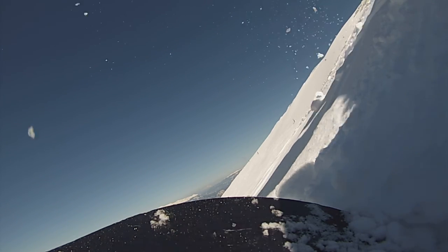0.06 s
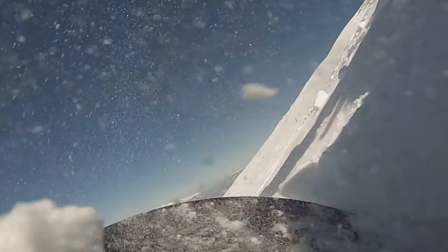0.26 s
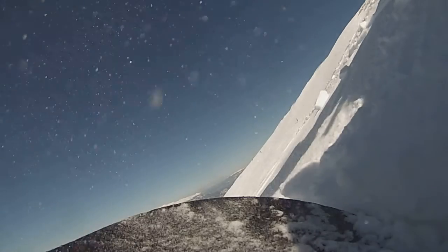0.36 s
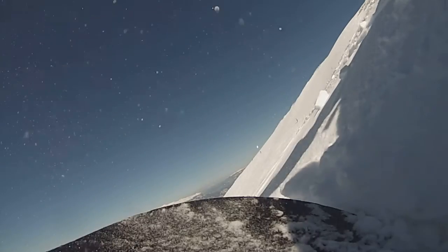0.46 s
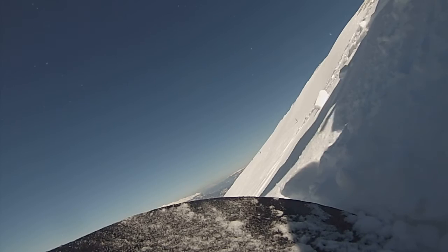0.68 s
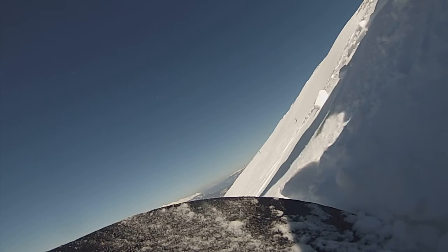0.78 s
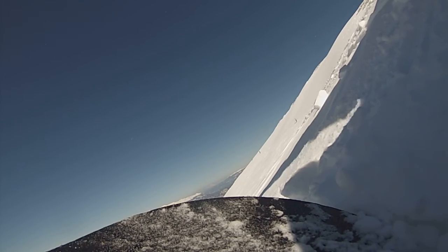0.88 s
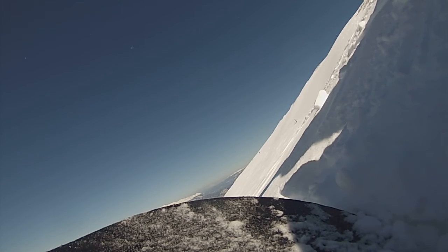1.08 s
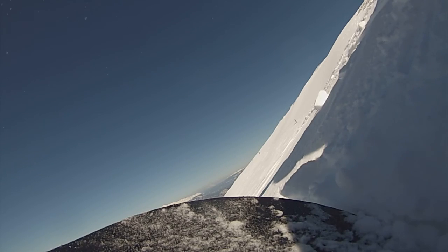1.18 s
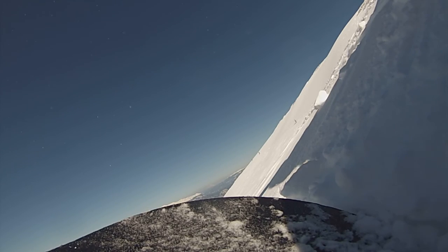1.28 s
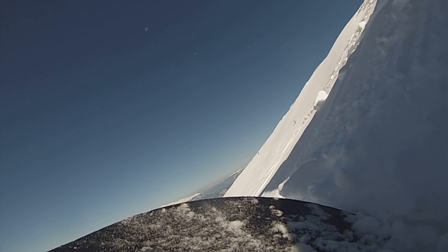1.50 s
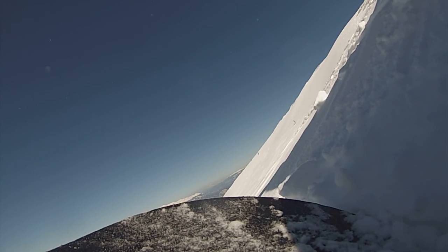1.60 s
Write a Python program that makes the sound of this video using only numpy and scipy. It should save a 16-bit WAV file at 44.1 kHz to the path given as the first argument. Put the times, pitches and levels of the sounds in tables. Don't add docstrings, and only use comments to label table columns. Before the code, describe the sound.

A snowboard slides over lumpy snow with a low hum, one hard slam, then clustered knocks

```python
import sys
import numpy as np
from scipy import signal
from scipy.io import wavfile
from scipy.ndimage import uniform_filter1d

SR = 44100
rng = np.random.default_rng(int(sys.argv[2]) if len(sys.argv) > 2 else 0)


def level_to_linear(level):
    exponent = np.asarray(level, float) / 20
    return 10 ** exponent


def inscribe(sig):
    pcm = np.round(np.clip(np.atleast_2d(sig).T, -1, 1) * 32767)
    wavfile.write(sys.argv[1], SR, pcm.astype(np.int16))


N = 72765

# start in seconds, level in dB, decay in dB per second (negative swells), pitch in Hz.
FLEX_KICKS = [(0, -29.5, 2, 93.4), (.022, -25, 124, 92.03), (0.158, -36.5, 24, 92.4),
              (0.259, -25, 113, 84.9), (0.387, -33.5, 142, 87.86), (0.607, -42, 122, 87.8),
              (0.813, -44.5, 45, 88.96), (0.939, -41, 103, 93.1), (1.026, -37, 111, 90.75),
              (1.131, -24.5, 67, 86.9), (1.199, -33.5, -19, 85.15), (1.311, -47, 200, 86.3),
              (1.343, -33.5, -70.5, 88.8), (1.385, -27, 10, 84.7), (1.423, -32.5, 1, 113.3),
              (1.478, -24.5, 5.5, 92.3), (1.509, -26.5, 19, 90.8), (1.546, -31.5, 269, 94.5)]
# start in seconds, peak in dB, share of the upper modes in dB, twisting mode in Hz.
LUMP_THUMPS = [(0.018, -30.5, -5.5, 213), (0.043, -30.5, -3.5, 206), (0.082, -28.5, -6, 217.4),
               (0.127, -38.5, -11.5, 228), (0.348, -36, -14, 220.4), (0.445, -46, -8, 218),
               (0.523, -48, 3, 223), (0.603, -44.5, -3, 230), (0.8, -35, -5.5, 210),
               (0.851, -39.5, -10.5, 225), (0.928, -36, -2.5, 223.6), (0.945, -29, -4.5, 216),
               (0.998, -41.5, -6, 217), (1.03, -32.5, -13, 227), (1.127, -14.5, -8.5, 219.4),
               (1.164, -10.5, -22, 221.6), (1.223, -30.5, -14, 225), (1.264, -25, -11.5, 225),
               (1.316, -33, -6, 220), (1.346, -26.5, -15, 238), (1.373, -24, -9, 248.2),
               (1.388, -19.5, -7.5, 240), (1.408, -21, -18, 253), (1.425, -38, -22, 215),
               (1.438, -20, -11, 224), (1.468, -21, -19.5, 241.8), (1.484, -22, -11, 241.2),
               (1.507, -27.5, -13.5, 228), (1.528, -33, -11, 227)]
# frequency in Hz, level in dB, 60 dB decay time in seconds.
DECK_LOW_MODES = [(39.4, -15.5, 0.11), (144, -0.5, 0.025), (268.5, -13.5, 0.13)]
# frequency in Hz, level in dB, 60 dB decay time in seconds.
DECK_UPPER_MODES = [(365, 7.5, 0.0087), (474, -2.5, 0.037), (699, -14, 0.052)]
# start in seconds, signed strength, crack in dB.
SLAM_CONTACTS = [
    (0.2311, 0.011, -18),
    (0.2357, -0.5, -4.5),
    (0.236, 0.81, -11),
    (0.2373, 0.81, -8.5),
    (0.2399, -0.26, -17),
    (0.2423, -0.6, -23),
    (0.2433, 0.42, -14),
]
# frequency in Hz, level in dB, 60 dB decay time in seconds.
SLAM_MODES = [(105, 5.5, 0.019), (39, -27.5, 0.5), (208, -3.5, 0.03), (217, -29.5, 0.36), (426, 4, 0.0053),
              (670, -10, 0.01), (1100, -7, 0.0057)]
# start in seconds, peak in dB, pitch in Hz, treble in dB.
CRUMB_TICKS = [(0.0222, -30, 1100, -38), (0.0416, -27.5, 1100, -21), (0.0524, -41, 1320, -39.5),
               (0.0827, -33.5, 1300, -53), (0.1959, -42, 1250, -6), (0.2872, -30.5, 1950, -4.5),
               (.294, -48, 1910, 7), (0.3005, -42, 1530, -0.5), (0.3087, -46.5, 2250, 6),
               (0.3436, -35, 1380, -35), (0.4413, -33.5, 2170, -14), (0.4682, -34, 1239, -11),
               (0.5238, -35, 1187, -4.5), (.53, -40.5, 1320, -16), (0.5384, -42, 1780, -6.5),
               (0.5564, -42, 2090, -50), (0.5911, -36, 1900, -18), (.597, -44.5, 1670, -19.5),
               (0.6869, -35.5, 1760, -10.5), (.692, -38, 1500, -18.5), (0.7035, -40.5, 1340, -25),
               (0.7405, -38.5, 1800, -17.5), (0.7642, -28, 1370, -21), (.7675, -38.5, 1500, -16),
               (0.78, -32, 1890, -8), (0.8015, -11, 1250, -45), (.8065, -26, 1460, -40),
               (.811, -24.5, 1300, -36.5), (0.8145, -34, 1500, -9), (.818, -21.5, 1660, -36),
               (0.8309, -28.5, 1240, -44), (0.8405, -26, 1650, -33), (.8435, -35.5, 1650, -7),
               (.8475, -26.5, 1600, -25), (0.853, -23, 1580, -41), (.859, -30, 1650, -30),
               (0.871, -29, 1710, -24)]
# start in seconds, peak in dB, pitch in Hz, treble
# in dB.
LATER_TICKS = [(0.9288, -36.5, 1240, -41), (.936, -40.5, 1350, -27), (0.9455, -32.5, 1120, -36),
               (0.998, -31, 1700, -5), (1.0008, -24.5, 2120, -18), (1.0258, -30, 1300, -27),
               (1.029, -17.5, 1200, -30), (1.033, -29, 1220, -17), (1.06, -34.5, 1170, -22),
               (1.1274, -10.5, 1420, -30), (1.1305, -22.5, 1200, -30), (1.1335, -12.5, 1220, -34),
               (1.156, -28.5, 1430, -33), (1.162, -31.5, 3230, -18), (1.1655, -11, 1270, -23),
               (1.17, -30.5, 1630, -13), (1.177, -25.5, 1800, -19), (1.183, -36, 1670, -14),
               (1.2246, -33.5, 1920, -29), (1.2506, -40, 1200, -14.5), (1.263, -34.5, 2050, -27),
               (1.269, -23, 1680, -42), (1.273, -40, 1570, -30), (1.295, -13, 2024, -14),
               (1.2995, -24, 1820, -40), (1.3545, -25, 1200, -14), (1.359, -36, 1220, -8.5),
               (1.3635, -35.5, 2180, -20), (1.373, -40, 2080, -24), (1.389, -25, 1030, -42),
               (1.393, -24, 1140, -42), (1.4217, -30.5, 1270, -24), (1.4392, -23, 1240, -21),
               (1.46, -34, 1500, -12), (1.5274, -30.5, 1733, -51), (1.5798, -61, 1470, -18.5)]
# frequency in Hz, width in Hz, level in dB.
CASE_RESONANCES = [(1250, 493, 11.5), (1860, 680, 5), (2121, 280, 11.5), (3330, 1540, -10.5),
                   (4780, 3060, -22), (5740, 1800, -21.5), (7570, 900, -31), (11500, 2300, -36.5)]
# start in seconds,
# peak in dB.
CRACK_TREBLE = [
    (.2358, -23),
    (.2428, -33),
    (.287, -52),
    (.3005, -52),
    (.3088, -38.5),
    (1.0005, -50.5),
    (1.2955, -52.5),
]
# start in seconds, peak in dB.
CRYSTAL_PRICKS = [(.0003, -48), (.2308, -47.5), (0.236, -31), (0.2427, -43), (0.2598, -66), (0.2865, -51.5),
                  (0.3004, -50), (0.309, -57), (0.385, -65.5), (0.4082, -60), (0.439, -64), (0.514, -68),
                  (0.5803, -63), (0.8137, -71), (0.841, -55), (0.8527, -60), (1.1653, -68), (1.354, -62)]
# time in seconds, scrape in dB, brightness in dB, rumble in dB.
BASE_SLIDE = [(0, -55.5, 15, -1), (.1, -63, 9, 1), (.15, -55, 9, -4), (.21, -43, -5, -9),
              (.26, -47, -4, 3.5), (.37, -51, 7, -5.5), (.43, -64, 13.5, -8), (.68, -63.5, 4, -4),
              (.8, -57.5, 4.5, 5.5), (.87, -67, 16, -1), (.91, -59.5, 0, -5.5), (1.1, -48, 3.5, -8.5),
              (1.18, -43.5, 2, 12), (1.22, -52.5, 5, 4), (1.42, -52.5, 8, -4.5), (1.45, -33.5, 3.5, -21),
              (1.54, -46, 6, -25.5), (1.58, -62.5, 12, 5.5)]
# from in seconds, to in seconds.
EDGE_SINGS = [
    (1.08, 1.2),
    (1.438, 1.55),
]


def flex():
    rise_s, wobble_hz, wobble_db = 0.0092, 2.37, 2.4
    s, db, decay, hz = np.transpose(FLEX_KICKS)
    t = np.arange(N) / SR
    k = np.clip(np.searchsorted(s, t, "right") - 1, 0, None)
    start = level_to_linear(db[0])
    target = level_to_linear(db[k] - decay[k] * (t - s[k]))
    level = start + smooth(target - start, rise_s)
    level = level * level_to_linear(wobble_db * drift(22))
    phase = 2 * np.pi * np.cumsum(hz[k] + wobble_hz * drift(11.0)) / SR
    return np.sqrt(2) * level * np.sin(phase)


def thumps():
    push_s, crunch_s, crunch_db = 0.0013, 0.005, 10.5
    twist_db, twist_t60_s = 0.5, 0.12
    s, db, upper_db, twist_hz = np.transpose(LUMP_THUMPS)
    luck_db = rng.normal(0, 2, (len(s), 8))
    low = np.zeros(N)
    for k, (hz, level_db, t60) in enumerate(DECK_LOW_MODES):
        hits = clicks(s, level_to_linear(db + level_db + luck_db[:, k]))
        low += (-1) ** k * ring(hits, hz, t60)
    for start, d, hz in zip(s, db, twist_hz):
        low += ring(clicks([start], level_to_linear(d + twist_db)), hz, twist_t60_s)
    q = np.exp(-1 / (crunch_s * SR))
    crushing = clicks(s, level_to_linear(db + upper_db + crunch_db))
    crunch = signal.lfilter([np.sqrt(1 - q * q)], [1, -q], crushing) * rng.standard_normal(N)
    upper = sum(level_to_linear(level_db) * ring(crunch, hz, t60) for hz, level_db, t60 in DECK_UPPER_MODES)
    return low_pass(level_to_linear(-6.5) * (2.2 * smooth(low, push_s) + upper), 690)


def slam():
    s, strength, crack_db = np.transpose(SLAM_CONTACTS)
    hits = clicks(s, strength)
    body = sum(level_to_linear(db) * ring(hits, hz, t60) for hz, db, t60 in SLAM_MODES)
    cracks = ticks([(start, db, 2000, -17) for start, db in zip(s, crack_db)], burst_s=0.00098)
    return low_pass(body, 2500) + cracks


def ticks(rows, burst_s=0.0024):
    rise_s, spark_share, note_width_hz = 0.0008, 0.9, 430
    shortening = 0.16
    tone_db, case_db, spark_db = -5, -7, -0.5
    size = 2048
    out = np.zeros(N + SR)
    t = np.arange(size) / SR
    rise = 1 - np.exp(-t / rise_s)
    for (s, db, hz, treble_db), noise in zip(rows, rng.standard_normal((len(rows), size))):
        last = burst_s * level_to_linear(-shortening * (db + 19.5))
        burst = noise * rise * np.exp(-t / last)
        spark = noise * rise * np.exp(-t / (last * spark_share))
        solid = burst + 0.48 * level_to_linear(db + 44.5) * (t == t[20])
        tone = top_one(peak_twice(solid, hz, note_width_hz))
        panels = top_one(case(burst, 0))
        treble = top_one(case(spark) - case(spark, 0))
        i = int(s * SR)
        mixed = level_to_linear(tone_db) * tone + level_to_linear(case_db) * panels + level_to_linear(treble_db + spark_db) * treble
        out[i:i + size] += level_to_linear(db) * mixed
    return out[:N]


def thin_click():
    return band(clicks([1.1425], level_to_linear(-29)), 1500, 11700)


def ice_bursts(rows, hz, width):
    s, db = np.transpose(rows)
    q = np.exp(-1 / (0.0014 * SR))
    burst = signal.lfilter([1], [1, -q], clicks(s, level_to_linear(db + 8))) * rng.standard_normal(N)
    return peak_twice(burst, hz, width)


def slide():
    grains_per_s, grain_spread_db, patch_db = 5000, 3, 2.5
    db, bright_db, rumble_db = in_time(BASE_SLIDE)
    t = np.arange(N) / SR
    sizes = level_to_linear(grain_spread_db * np.minimum(rng.exponential(1, N), 5)) * rng.choice([-1, 1], N)
    grains = sizes * (rng.random(N) < grains_per_s / SR) * level_to_linear(patch_db * drift(48))
    scrape = sealed(case(grains, level_to_linear(bright_db))) / np.std(case(grains))
    loaded = sum((t > a) * (t < b) * 1.0 for a, b in EDGE_SINGS)
    sing = rms_one(peak_twice(grains, 7850, 700)) * uniform_filter1d(loaded, size=500)
    rumble = rms_one(band(rng.standard_normal(N) * level_to_linear(2.8 * drift(25)), 130, 480))
    return level_to_linear(db) * (scrape + level_to_linear(-4.5 + rumble_db) * rumble + level_to_linear(-31) * sing)


def spray():
    middle_s, spread_s = 0.145, 0.028
    t = np.arange(N) / SR
    puff = np.exp(-0.5 * ((t - middle_s) / spread_s) ** 2)
    return level_to_linear(-64) * noise_band(4920, 7650) * puff


def sway():
    scrape_db = in_time(BASE_SLIDE)[0]
    return level_to_linear(-88 + 0.6 * (scrape_db + 34.5)) * noise_band(29, 55.5)


def hiss():
    return level_to_linear(-77.5) * noise_band(2500, 14500)


def case(x, treble=1):
    rings = [(-1) ** k * level_to_linear(db) * peak_twice(x, hz, width)
             for k, (hz, width, db) in enumerate(CASE_RESONANCES)]
    return sum(rings[:3]) + treble * sum(rings[3:])


def sealed(x):
    return signal.sosfilt(signal.butter(3, [980, 11000], "band", fs=SR, output="sos"), x)


def ring(x, hz, t60):
    r, w = level_to_linear(-60 / (t60 * SR)), 2 * np.pi * hz / SR
    return signal.lfilter([0, np.sin(w)], [1, -2 * r * np.cos(w), r * r], x + 1e-18)


def peak(x, hz, width):
    r = np.exp(-np.pi * width / SR)
    poles = [1, -2 * r * np.cos(2 * np.pi * hz / SR), r * r]
    return signal.lfilter([(1 - r * r) / 2, 0, (r * r - 1) / 2], poles, x + 1e-18)


def peak_twice(x, hz, width):
    return peak(peak(x, hz, width), hz, width)


def band(x, low_hz, high_hz):
    return signal.sosfilt(signal.butter(2, [low_hz, high_hz], "band", fs=SR, output="sos"), x)


def noise_band(low_hz, high_hz):
    return rms_one(band(rng.standard_normal(N), low_hz, high_hz))


def low_pass(x, hz):
    return signal.sosfilt(signal.butter(2, hz, fs=SR, output="sos"), x)


def smooth(x, seconds):
    r = np.exp(-1 / (seconds * SR))
    return signal.lfilter([1 - r], [1, -r], x)


def drift(rate):
    r = np.exp(-2 * np.pi * rate / SR)
    return rms_one(signal.lfilter([1], [1, -2 * r, r * r], rng.standard_normal(N + SR))[SR:])


def clicks(s, strength):
    out = np.zeros(N)
    np.add.at(out, (np.asarray(s) * SR).astype(int), strength)
    return out


def in_time(rows):
    s, *columns = np.transpose(rows)
    return [np.interp(np.arange(N) / SR, s, c) for c in columns]


def rms_one(x):
    return x / np.sqrt(np.mean(x ** 2) + 1e-20)


def top_one(x):
    return x / np.abs(x).max()


def scene():
    slam_s, lead_s, dip_db = 0.2305, 0.009, -20
    t = np.arange(N) / SR
    dipped = np.minimum(t - slam_s + lead_s, slam_s + 0.0008 - t) / 0.00096
    dip = level_to_linear(dip_db * np.clip(dipped, 0, 1))
    board = flex() + thumps() + slide() + spray() + sway() + hiss()
    knocks = sealed(ticks(CRUMB_TICKS) + ticks(LATER_TICKS)) + thin_click()
    ice = ice_bursts(CRACK_TREBLE, 5500, 2900) + ice_bursts(CRYSTAL_PRICKS, 11300, 3200)
    return (board * dip + slam() + knocks + ice)[None]


def top_cut(x):
    return signal.sosfilt(signal.butter(12, 15900, fs=SR, output="sos"), x)


def record(dry):
    rounded = low_pass(np.clip(dry, -1, 1), 13500)
    return top_cut(np.clip(rounded, -1, 1))


dry = scene()
out = record(dry)
inscribe(out)
```